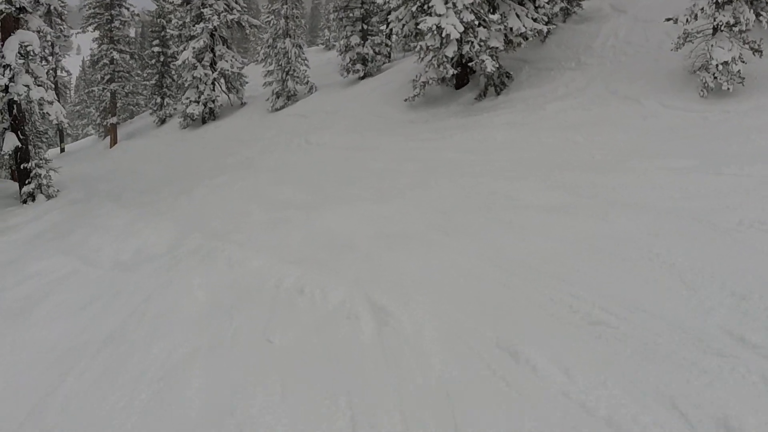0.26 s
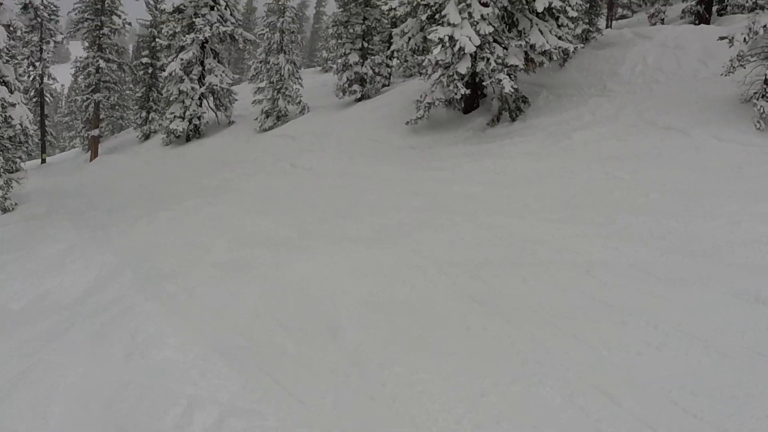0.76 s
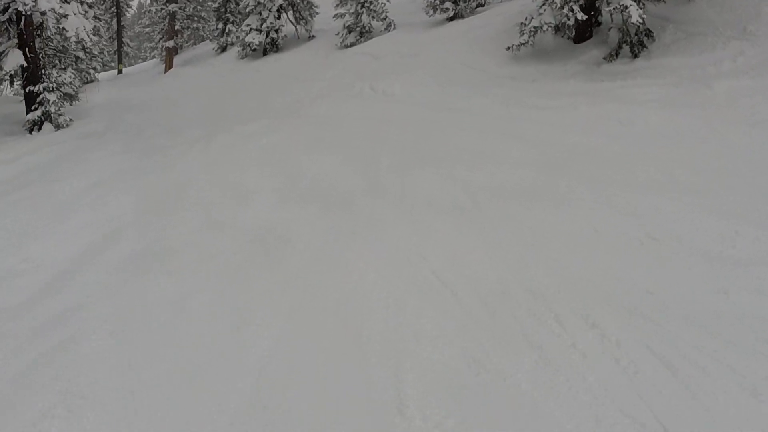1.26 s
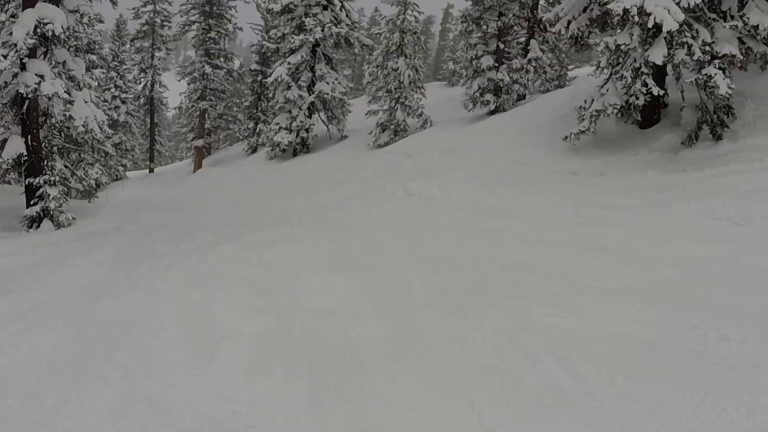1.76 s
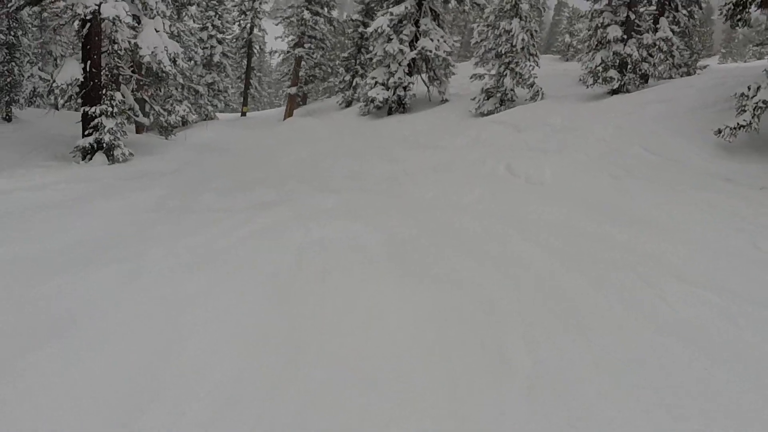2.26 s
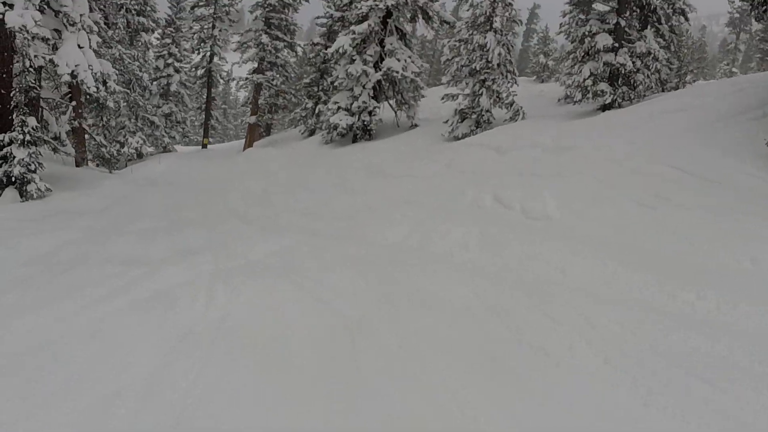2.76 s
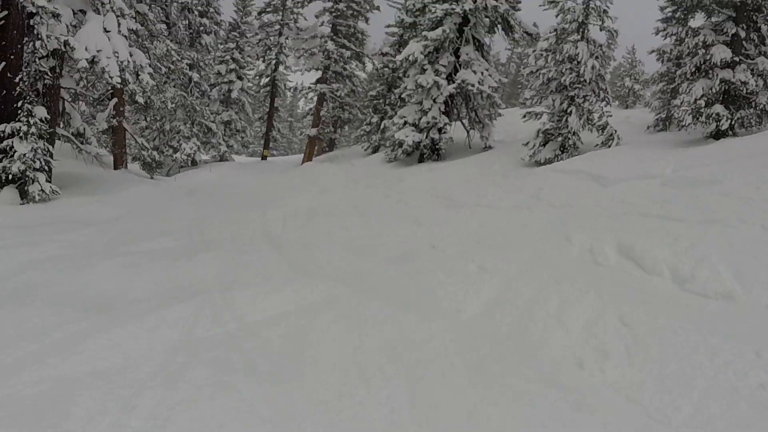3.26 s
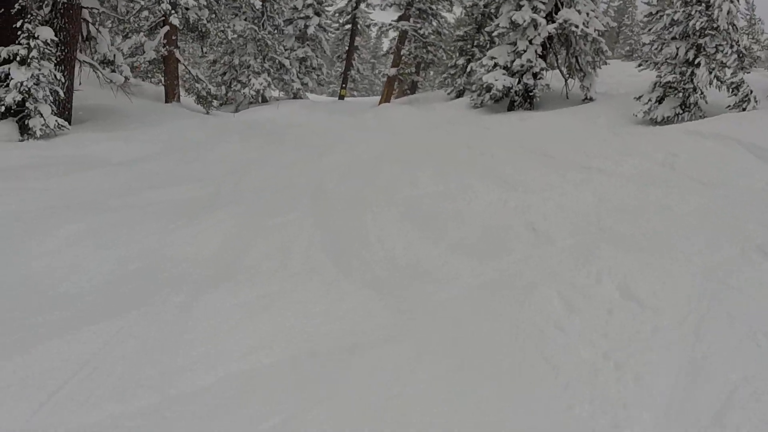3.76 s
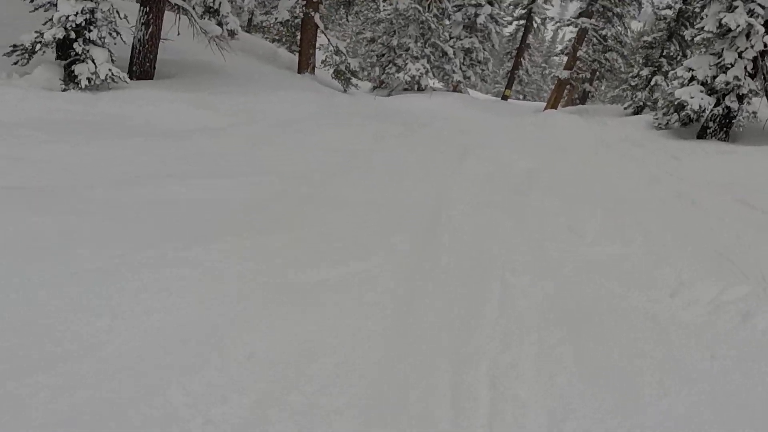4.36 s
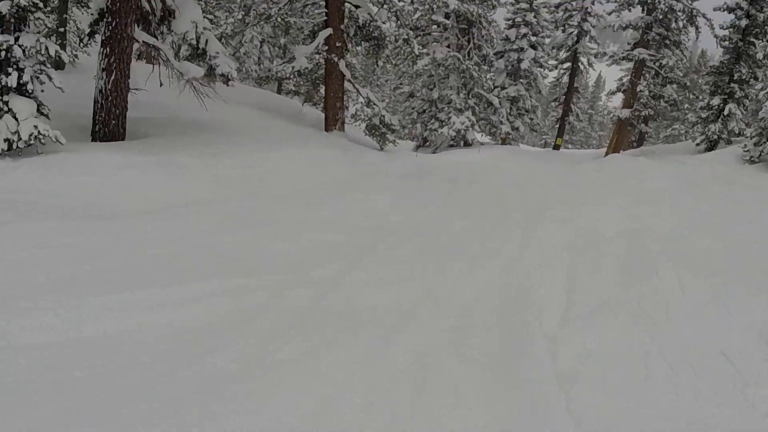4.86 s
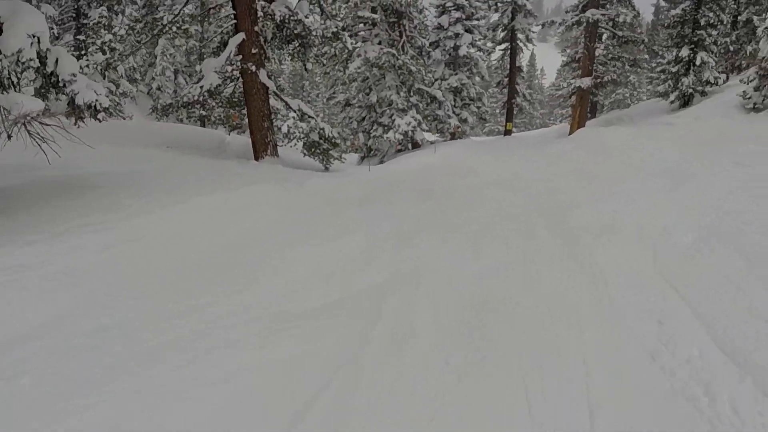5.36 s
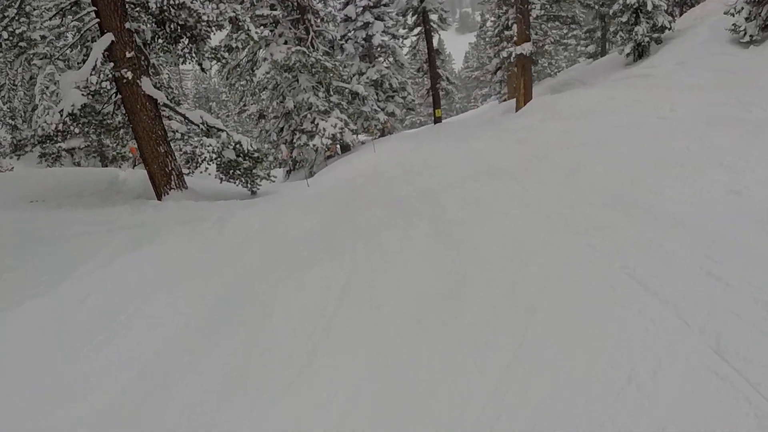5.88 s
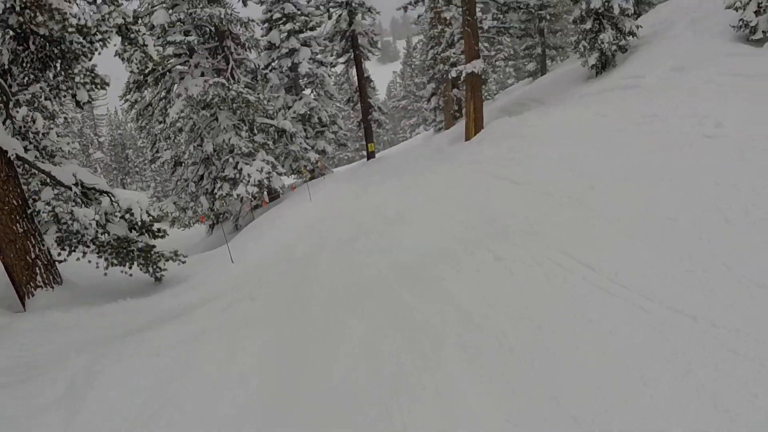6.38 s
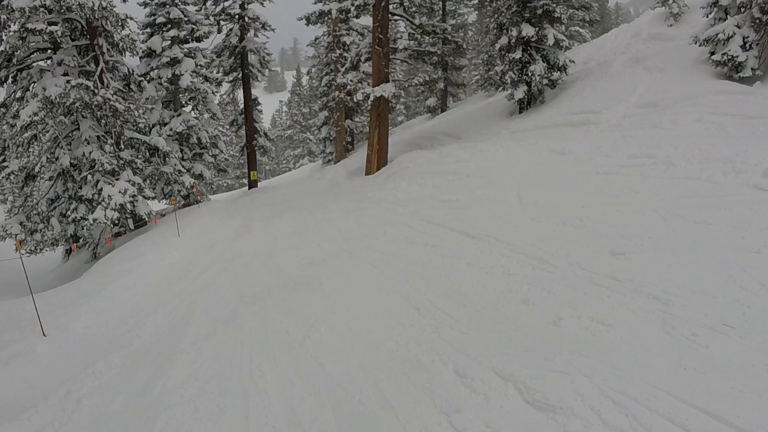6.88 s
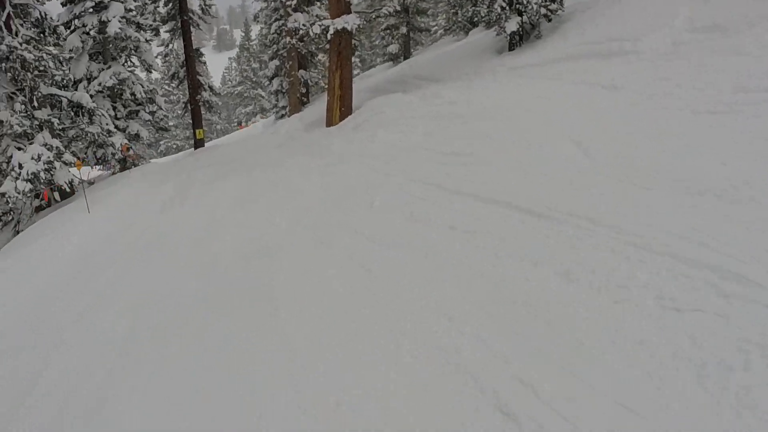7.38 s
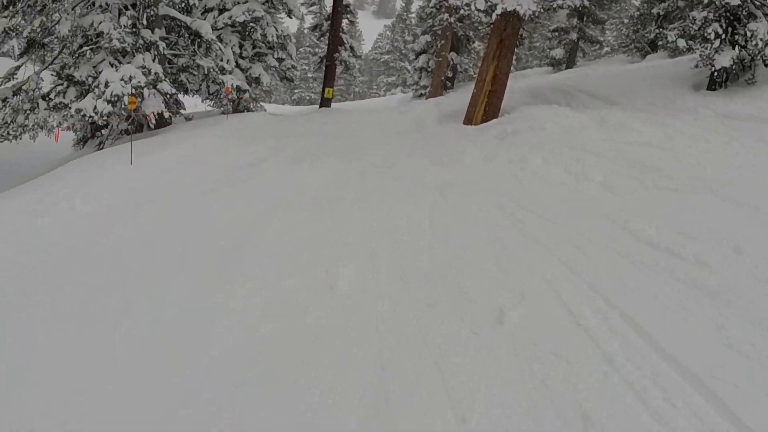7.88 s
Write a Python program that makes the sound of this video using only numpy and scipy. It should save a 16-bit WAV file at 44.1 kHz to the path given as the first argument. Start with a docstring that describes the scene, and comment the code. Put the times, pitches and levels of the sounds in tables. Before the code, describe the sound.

Close, dry sound inside a housing worn by a skier. For the first second there is a faint swish of skis, a light scrape, snow ticks and low air rumble that rises near 0.7 s. From 1.2 to 1.4 s three hard hollow knocks land, each a short clack over a low boomy bounce; more follow at 1.9 and, strongly, 2.1 s, with softer ones near 2.5 and 3.0. Edges scrape more firmly from 2.7 s. Heavy knocks return at 4.1 and 4.4, lesser ones at 4.7 and 5.2, as a long scrape swells until about 5.9. A sharp creak and heave at 5.6 lead into strong knocks at 5.65 and 5.9. Duller thumps come at 6.2, 6.55 and faintly 7.0, among bright rasping scrapes. The swish then eases, with ticks, small scrapes and a faint final bump and creak near 8 s.

```python
"""A wooded slope: skis hiss through soft snow, heard from a camera in a closed housing that the skier wears.
Shaped noise makes the swish of the ski bases, the scrape of the edges and the rumble of the airstream.
Snow grains tick on the housing wall as short struck resonances, and fine powder patters as scraps of noise.
The loose mount shudders and creaks; at bumps it heaves, and knocks against its stop so the housing rings."""
import sys
import numpy as np
from scipy.fft import rfft, irfft, next_fast_len
from scipy.io import wavfile
from scipy.ndimage import map_coordinates

SR = 44100
rng = np.random.default_rng(int(sys.argv[2]) if len(sys.argv) > 2 else 0)


def unload_wav(signal):
    """Save mono or channel-first audio to the path in sys.argv[1] as 16-bit WAV at rate SR, clipped to [-1, 1]."""
    wavfile.write(
        sys.argv[1],
        SR,
        np.round(np.clip(np.atleast_2d(signal).T, -1, 1) * 32767).astype(np.int16),
    )


N = 358517

# soft heaves of the mount: middle_s is the middle of the push
# columns: middle_s [s], peak_db [dB], half_length_s [s]
HEAVES = [(1.091, -27, 0.0064), (1.4, -19, 0.0062), (2.433, -26, 0.0099), (4.298, -21, 0.0054),
          (5.594, -10, 0.0034), (6.162, -24.5, 0.013)]
# resonances of the housing wall under a grain: pitch_hz [Hz], width_hz [Hz], level_db [dB, between modes]
WALL = [(2080, 1200, -7.5), (4770, 240, 2.5), (5980, 1400, -2), (6760, 1420, -1.5)]


def amp(db):
    """Turn decibels into a gain."""
    return 10 ** (np.asarray(db) / 20)


def unit(x):
    """Scale x to an rms (average strength) of 1."""
    return x / np.sqrt(np.mean(x ** 2) + 1e-20)


def clock():
    """Time of every sample in seconds."""
    return np.arange(N) / SR


def curve(points):
    """Join (time_s, value) points by straight lines, one value per sample."""
    time_s, value = np.transpose(points)
    return np.interp(clock(), time_s, value)


def wobble(rate):
    """A smooth random curve with `rate` random points a second."""
    knots = rng.standard_normal(int(N * rate / SR) + 4)
    return map_coordinates(knots, [np.arange(N) * rate / SR])


def filtered(x, response):
    """Filter x by a response given as a function of frequency."""
    size = next_fast_len(len(x) + 8192)  # spare room lets a ring die out
    f = np.fft.rfftfreq(size, 1 / SR)
    return irfft(rfft(x, size) * response(f), size)[:len(x)]


def coloured(x, spectrum):
    """Shape the tone of x by (pitch_hz, level_db) points, then set its rms to 1."""
    hz, db = np.transpose(spectrum)
    return unit(filtered(x, lambda f: amp(np.interp(np.log(f + 1), np.log(hz), db))))


def coloured_noise(spectrum):
    """Steady noise of the given tone, at rms 1."""
    return coloured(rng.standard_normal(N), spectrum)


def resonances(modes, f):
    """Response of a body with (pitch_hz, width_hz, level_db) modes, whose signs alternate."""
    total = 0
    for k, (hz, width, db) in enumerate(modes):
        sign = (-1) ** (k + 1)
        total = total + sign * amp(db) * 1j * f * width / (hz * hz - f * f + 1j * f * width)
    return total


def blow(modes, hardness_hz, nulls=(), size=8192):
    """One contact on a resonant body, peak 1; a soft contact lasts longer and leaves out the treble."""
    f = np.fft.rfftfreq(size, 1 / SR)
    response = resonances(modes, f) / (1 + 1j * f / hardness_hz) ** 3
    for hz, width in nulls:
        response = response * (hz * hz - f * f) / (hz * hz - f * f + 1j * f * width)
    ring = irfft(response)[:size // 2]
    return ring / np.abs(ring).max()


def varied(modes, spread_db, detune):
    """The same modes struck at another spot: pitches and levels shift at random."""
    return np.array([(hz * (1 + detune * rng.normal()), width, db + spread_db * rng.normal())
                     for hz, width, db in modes])


def add(track, s, sound):
    """Mix a sound into the track at time s."""
    part = track[max(round(s * SR), 0):][:len(sound)]
    part += sound[:len(part)]


def hiss():
    """A faint steady noise under everything."""
    return amp(-75.0) * coloured_noise([(100, 5), (6000, -5), (12000, -6), (15500, -13)])


def glide():
    """How hard the skis run on the snow: level of the swish in dB, and its swing about the mean."""
    # columns: time_s [s], level_db [dB, before the swish gain]
    glide_points = [(0, -55.5), (.8, -57.5), (1.05, -56.5), (1.38, -50.5), (1.6, -56.5), (2.6, -52.5),
                    (3.05, -49), (3.45, -52.5), (3.85, -49.5), (4.8, -50), (5.35, -47.5), (5.75, -49.5),
                    (6.1, -49.5), (6.3, -52), (6.55, -49.5), (7.2, -54), (7.55, -49.5), (8.12, -54)]
    swish_gain_db = 3
    db = curve(glide_points)
    return db + swish_gain_db, db - db.mean()


def bites():
    """Gain of the edges biting into snow: each sets, swells or eases, and lets go; the deepest leads."""
    # columns: start_s [s], length_s [s], level_db [dB, halfway], swell_db [dB, from start to end]
    scrapes = [(0.18, 0.25, -56, -5), (0.828, 0.063, -55.5, 0), (1.17, 0.32, -54.5, -1),
               (1.72, 0.31, -55.5, 2), (2.048, 0.56, -53.5, -11), (2.678, 0.38, -44, 6),
               (3.167, 0.18, -48, -8), (3.345, 0.5, -48.5, 6), (4.1, 1.76, -47, 12.5),
               (5.83, 0.12, -39, -1.5), (5.968, .24, -45.5, 3.5), (6.475, .17, -44, -5),
               (6.684, .32, -41, -0.5), (7.293, 0.15, -50, 7), (7.56, 0.19, -47.5, -5)]
    bite_s, release_s = 0.037, 0.071  # time for an edge to set and to let go
    t, out = clock(), np.zeros(N)
    for s, length, db, swell_db in scrapes:
        rise = np.clip((t - s) / bite_s, 0, 1)
        release = np.clip(1 - (t - s - length) / release_s, 0, 1)
        progress = np.clip((t - s) / length, 0, 1)
        out = np.maximum(out, rise * release * amp(db + swell_db * (progress - .5)))
    return out


def skis():
    """The bases swish and the edges scrape as shaped noise, both roughened by the uneven snow."""
    # tone of the swishing bases, columns: pitch_hz [Hz], level_db [dB per Hz, relative]
    base_spectrum = [(100, -24), (250, 0.5), (420, -7), (700, -10), (1000, -3.5), (1170, -6), (1450, -2),
                     (1850, 3), (2300, -2.5), (2900, -3), (4000, -14.5), (6000, -22), (9000, -34.5),
                     (15000, -48)]
    # tone of the scraping edges, columns: pitch_hz [Hz], level_db [dB per Hz, relative]
    edge_spectrum = [(1200, -46), (2100, -3), (2600, 6.5), (3000, 1.5), (3400, 8), (3900, 4.5), (4300, -18),
                     (5200, -19.5), (5750, -7.5), (6200, -36), (7100, -25), (8500, -47), (10300, -31),
                     (15000, -63)]
    bite_swish = 0.24  # share of a bite that the base joins in
    edge_rest_db, edge_grows = -57, 1.3  # scrape of a flat ski at mean glide; its dB per dB of glide
    base_db, swing_db = glide()
    bite = bites()
    snow_db = .5 * wobble(22)  # unevenness that both share
    base_gain = np.hypot(amp(base_db), bite_swish * bite)
    base = base_gain * amp(snow_db + 1.2 * wobble(70)) * coloured_noise(base_spectrum)
    edge_gain = np.hypot(amp(edge_rest_db + edge_grows * swing_db), bite)
    edge = edge_gain * amp(-2.06 + snow_db + 1.8 * wobble(120)) * coloured_noise(edge_spectrum)
    return base + edge


def airstream():
    """Air buffets the housing as low rumbling noise, with an added rush at each heave."""
    # columns: time_s [s], level_db [dB, before gusts and wobble]
    air_points = [(0, -49), (.45, -50.5), (.75, -38.5), (1.5, -36.5), (1.65, -43.5), (2.2, -44.5),
                  (2.42, -33.5), (2.8, -45), (2.97, -36), (3.14, -45.5), (3.9, -42), (5.3, -43),
                  (5.6, -38.5), (6.45, -37), (6.74, -46), (7, -39), (7.75, -49.5), (8.12, -43.5)]
    # tone of the rumble, columns: pitch_hz [Hz], level_db [dB per Hz, relative]
    air_spectrum = [(8, 0.5), (20, 2), (45, -9), (80, -14), (200, -31), (600, -40), (2000, -100)]
    gust_db, gust_s = -37, .06  # level and half length of a rush
    t = clock()
    gusts = amp(gust_db) * sum(np.exp(-.5 * ((t - s) / gust_s) ** 2) for s, _, _ in HEAVES)
    gain = np.hypot(amp(curve(air_points)), gusts)
    return gain * amp(0.96 * wobble(9)) * coloured_noise(air_spectrum)


def shudder():
    """Rough ground shakes the mount without pause: random jolts ring mainly its lowest resonance."""
    # rough patches, columns: start_s [s], level_db [dB, before rise and fade]
    patch_rows = [(.37, -45.5), (1.08, -32.5), (1.26, -37), (1.79, -35), (2.02, -36), (2.369, -32),
                  (2.6, -34), (3.98, -35), (4.27, -33), (4.65, -32.5), (4.86, -42), (5.1, -41), (6.14, -32),
                  (6.5, -39), (7.4, -43), (8.09, -34.5)]
    rise_s, fade_s = 0.013, .07  # a patch's shudder builds and dies
    rest_db, grows = -50, 1  # level on smooth snow at mean glide; dB per dB of glide
    t = clock()
    _, swing_db = glide()
    patches = np.zeros(N)
    for s, db in patch_rows:
        rise = np.clip((t - s) / rise_s, 0, 1)
        patches += amp(db) * rise * np.exp(-np.maximum(t - s, 0) / fade_s)
    jolts = rng.standard_normal(N) * amp(2.8 * wobble(25))
    modes = [(102.2, 10.5, 2), (217, 110, -20.5), (315, 51, -21)]  # Hz, width Hz, dB
    shaking = unit(filtered(jolts, lambda f: resonances(modes, f) / (1 + 1j * f / 400) ** 2))
    return np.hypot(amp(rest_db + grows * swing_db), patches) * shaking


def scrap(hz, count):
    """A scrap of noise in a broad band around hz, at rms 1."""
    f = np.fft.rfftfreq(count, 1 / SR)
    band = 1 + ((f - hz) / 2800) ** 2
    return unit(irfft(rfft(rng.standard_normal(count)) / band, count))


def spray():
    """Fine powder patters on the housing, each grain at its own pitch; a harder glide throws a little more."""
    base_db, _ = glide()
    flow = np.cumsum(amp(.4 * base_db))  # powder thrown so far
    out, t = np.zeros(N), np.arange(SR // 200) / SR
    envelope = (1 - np.exp(-t / .00015)) * np.exp(-t / .0008)
    for when, pitch, rarity in rng.random(size=(620, 3)):
        hz = 5000 + 8000 * pitch ** 1.7
        db = -57 - 5.3 * np.log(rarity + 0.033) - 9 * pitch  # many tiny grains, a few larger
        grain = scrap(hz, len(t)) * envelope
        add(out, np.searchsorted(flow, when * flow[-1]) / SR, amp(db) * grain)
    return out


def crumble(sound, life):
    """A grain breaks as it lands: the first tap is followed by a fading scatter of fragments."""
    t = np.arange(SR // 100) / SR
    fragments = 0.12 * rng.standard_normal(len(t)) * np.exp(-t / life)
    fragments[0] = 1
    return np.convolve(sound, fragments / np.linalg.norm(fragments))


def ticks():
    """The larger snow grains tap the wall, with a bright snap and a ring of its mode near 3 kHz."""
    # columns: start_s [s], tap_db, ring_db, snap_db [dB, before the gains added below]
    tick_rows = [(0.1456, -32, -37, -55), (0.632, -41.5, -56, -62), (0.8263, -40.5, -56, -71),
                 (0.8984, -44, -43.5, -60), (1.462, -51, -40, -74), (1.5784, -46, -58, -57),
                 (1.761, -34, -42, -58), (2.0965, -35.5, -47, -44), (2.1401, -37, -33.5, -52),
                 (2.7136, -40, -52, -57), (2.932, -37.5, -38.5, -64), (3.2546, -37.5, -51, -56),
                 (3.982, -27, -33.5, -52), (4.638, -34, -52, -60), (5.003, -50, -32, -57),
                 (5.1163, -34.5, -51, -58), (5.312, -38, -54, -59), (5.4546, -32.5, -53, -58),
                 (5.7214, -46, -40, -58), (6.4406, -45, -37, -55), (6.646, -35.5, -29.5, -48.5),
                 (7.0429, -31, -42, -68), (7.1926, -36, -42.5, -64), (7.4849, -35.5, -44, -52),
                 (7.8407, -31.5, -43, -55)]
    snap_modes = [(10500, 1300, -0.77), (13100, 1300, -2.2)]  # Hz, width Hz, dB
    out = np.zeros(N)
    for s, tap_db, ring_db, snap_db in tick_rows:
        tap = amp(tap_db + 5.5) * blow(varied(WALL, spread_db=0.5, detune=0.063), 11600)
        snap_blow = blow(varied(snap_modes, spread_db=1.5, detune=0.032), 15000)
        snap = amp(snap_db + 12.5) * snap_blow
        ring_lift_db = 7.5 + .5 * np.clip(ring_db + 35.5, -12, 8)  # strong rings stand out more
        ring = amp(ring_db + ring_lift_db) * blow([(2980, 196, 0)], 5500)
        add(out, s + 0.00097, crumble(tap + snap, life=0.0018))
        add(out, s + 0.000917, ring)
    return out


def strays(count=20):
    """Smaller grains tap the wall at scattered moments all along the run, each at its own spot."""
    level_db, spread_db = -42.5, 2.5  # typical tap before it crumbles, and its random scatter
    out = np.zeros(N)
    for when in (np.arange(count) + rng.random(count)) / count:
        tap = blow(varied(WALL, spread_db=1, detune=0.044), 12000)
        gain = amp(level_db + spread_db * rng.normal())
        add(out, when * N / SR, gain * crumble(tap, life=0.0021))
    return out


def creaks():
    """The joints of the mount slip: each short creak is a quick burst of rubbing noise that fades."""
    # columns: start_s [s], level_db [dB, of the rub before rise and fade], fade_s [s]
    creak_rows = [(0.385, -45, 0.012), (1.047, -38, 0.0066), (1.716, -39.5, 0.0064), (3.481, -35.5, 0.0061),
                  (5.5814, -20.5, 0.0063), (5.597, -29.5, 0.0092), (8.067, -32, 0.0035)]
    rub = coloured_noise([(500, -6.0), (1100, -0.5), (1500, 1.0), (2050, 8.0), (2500, 2.0),
                          (3500, -16.5), (5500, -16.5), (7000, -36), (9000, -55)])
    t, out = clock(), np.zeros(N)
    for s, db, fade_s in creak_rows:
        age = np.maximum(t - s, 0)
        out += amp(db) * rub * (1 - np.exp(-age / 0.00071)) * np.exp(-age / fade_s)
    return out


def heaves():
    """Big bumps heave the mount in one slow push, with a small opposite swing on either side."""
    t, out = clock(), np.zeros(N)
    for s, db, half in HEAVES:
        u = (t - s) / half
        out -= amp(db) * (1 - u ** 2 / 2) * np.exp(-u ** 2 / 2)
    return out


def knocks():
    """The mount hits its stop and rings the housing: a short clack over a low bounce; some spring back."""
    # resonances of mount and housing, columns: pitch_hz [Hz], width_hz [Hz], level_db [dB, between modes]
    housing = [(103.9, 18.2, 0.5), (243.5, 159, -8), (380, 113.4, -10), (638, 43, -30.5), (898, 24, -34.5),
               (1080, 75, -48), (1160, 47, -58), (1321, 80, -17), (1643, 59, -16.5), (1838, 20.5, -16.5),
               (2213, 146, -18), (2476, 105, -18), (3385, 190, -19.5), (5500, 610, -29)]
    # pitches where the modes cancel at the microphone, columns: pitch_hz [Hz], width_hz [Hz]
    cancelled = [(455, 40), (805, 19)]
    # columns: start_s [s], peak_db [dB, before spring-back], hardness_hz [Hz], spring_back [0-1]
    knock_rows = [(1.2094, -4.5, 2400, 0.1), (1.3389, -9, 2300, 0.05), (1.4179, -1.5, 2320, 0.04),
                  (1.7888, -23.5, 1070, 0), (1.8862, -12.5, 1880, 0.01), (2.1154, -3.5, 2700, 0.02),
                  (2.4601, -15, 1900, 0), (3.0377, -12, 1630, 0), (3.3835, -24.5, 450, 0.03),
                  (3.838, -32.5, 600, 0.25), (4.0807, -4.5, 2150, 0.05), (4.3639, -7, 2170, 0),
                  (4.7429, -17, 1300, 0), (5.1966, -16, 1120, 0.01), (5.6566, -4.5, 2400, 0.07),
                  (5.9112, -6.5, 2300, 0), (6.1888, -10, 980, 0.31), (6.5531, -10.5, 474, 0.5),
                  (6.9832, -21, 302, 0.26), (7.989, -33.5, 400, 0)]
    out = np.zeros(N)
    for s, db, hardness_hz, spring in knock_rows:
        modes = varied(housing, spread_db=1.15, detune=0.006)
        knock = amp(db) * blow(modes, hardness_hz, cancelled, size=16384)
        add(out, s, knock)
        add(out, s + 0.00378, -spring * knock)  # the spring-back pushes the other way
    return out


def scene():
    """All the sounds together; open snow gives no echo."""
    ground_and_air = hiss() + skis() + airstream()
    grains = spray() + ticks() + strays()
    mount = shudder() + creaks() + heaves() + knocks()
    return (ground_and_air + grains + mount)[None]


def record(dry):
    """The camera keeps nothing above its band limit of 15600 Hz."""
    return np.array([filtered(channel, lambda f: f < 15600) for channel in dry])


dry = scene()
out = record(dry)
unload_wav(out)
```